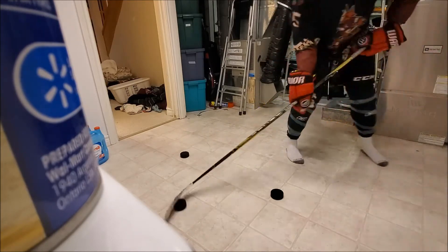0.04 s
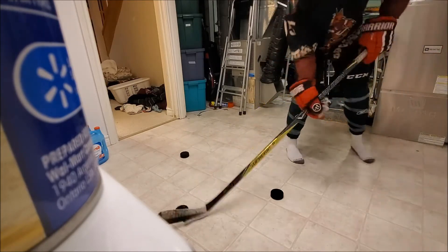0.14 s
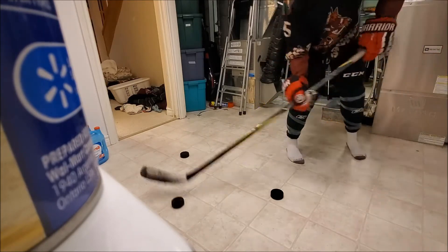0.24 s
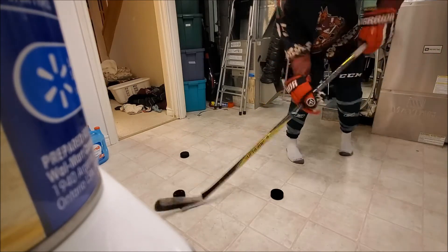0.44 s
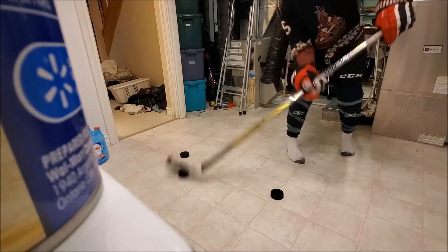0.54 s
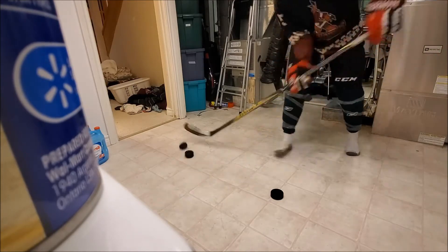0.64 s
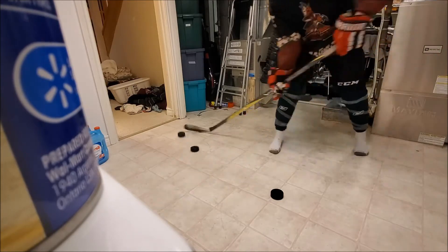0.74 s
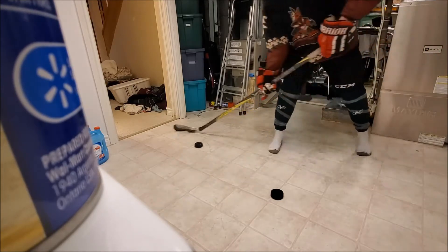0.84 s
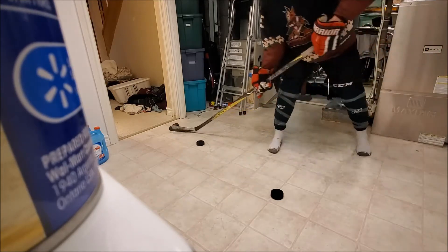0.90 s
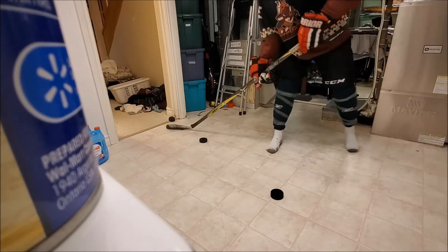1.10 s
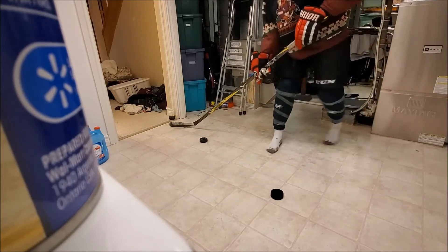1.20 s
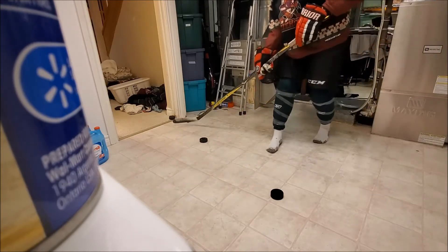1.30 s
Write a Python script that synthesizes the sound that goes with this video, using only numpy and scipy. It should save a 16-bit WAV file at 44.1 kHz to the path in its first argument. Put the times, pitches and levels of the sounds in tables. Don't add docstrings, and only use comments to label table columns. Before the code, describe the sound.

Hockey stick blade clacks sharply on a rubber puck and tiled floor, then the puck slides off

```python
import sys
import numpy as np
from scipy import signal
from scipy.fft import rfft, irfft
from scipy.io import wavfile
from scipy.ndimage import uniform_filter1d

SR = 44100
rng = np.random.default_rng(int(sys.argv[2]) if len(sys.argv) > 2 else 0)


def volts(x):
    e = np.asarray(x, float) / 20
    return 10 ** e


def log_audio(samples):
    frames = np.atleast_2d(samples).T
    limited = np.clip(frames, -1, 1)
    pcm = np.round(limited * 32767).astype(np.int16)
    wavfile.write(sys.argv[1], SR, pcm)


N = 59535

# (frequency [Hz], level [dB], time to fall 60 dB [s])
BODY_MODES = [(480.3, -9, 0.09), (570, -1, 0.01), (705, 3.5, 0.021), (806.6, 10.5, 0.017), (899, 1, 0.034),
              (1027.4, 11.5, 0.018), (690, -6, 0.0029)]
# (frequency [Hz], level [dB], time to fall 60 dB [s])
MIDDLE_MODES = [(1165, 2, 0.028), (1462, -5, 0.024), (1600, -7, 0.017), (2042, -6, 0.045),
                (2146.6, 2.5, 0.036), (1644, 13, 0.009)]
SOFT_DIRECT_DB = -7.5


def unit_rms(x):
    return x / np.sqrt(np.mean(x ** 2) + 1e-20)


def unit_energy(x):
    return x / np.linalg.norm(x, axis=-1, keepdims=True)


def read(points, hz):
    f, value = np.transpose(points)
    return np.interp(np.log(hz + 1), np.log(f + 1), value)


def colour(x, points):
    hz = np.fft.rfftfreq(x.shape[-1], 1 / SR)
    low_fade = np.clip(hz / points[0][0], 0, 1) ** 4
    return irfft(rfft(x) * volts(read(points, hz)) * low_fade, x.shape[-1])


def resonate(x, hz, width):
    r = np.exp(-np.pi * width / SR)
    return signal.lfilter([1, 0, -1], [1, -2 * r * np.cos(2 * np.pi * hz / SR), r * r], x)


def stick():
    # (time [s], blow [dB], low body [dB], upper blade [dB], tick [dB])
    taps = [
        (0.2119, -17.5, -0.5, -3, -13.5),
        (0.3573, -13.5, -9.5, -3, -17.5),
        (0.5117, -13.5, -5, -4, -15.5),
        (0.7427, -11, -7, 0, -18.5),
    ]
    # (left [dB], right [dB])
    tap_direct_db = [(-14.5, -5), (-39, -1), (-10.5, -4.5), (-22, -12)]
    # (time [s], blow [dB], low body [dB], upper blade [dB], tick [dB])
    bumps = [
        (-.05, -22, 4, -3.5, -11.5),
        (0.167, -60.5, -6, 5, 1),
        (0.41, -26.5, 3.5, -1.5, -10.5),
        (.5432, -26.5, 6, 3.5, -5.5),
        (.836, -41, 3, -11, -3),
        (1.151, -47, 3, 4.5, -2),
        (1.291, -71, 16.5, 11.5, 2),
        (.2295, -32.5, 5.5, -7, -14),
        (0.2447, -33.5, 6, -10, -20),
    ]
    # (time [s], level [dB])
    thuds = [
        (-.03, -34.5),
        (0.219, -28.5),
        (0.247, -57),
        (.362, -35),
        (.415, -35),
        (.518, -25),
        (.545, -26),
        (0.749, -37),
        (.84, -31.5),
    ]
    # (time [s], blow [dB], middle modes [dB], tick [dB], straight left [dB], straight right [dB])
    edge_blow = (.6612, -19.5, -13.5, -19.5, -8.5, -1.5)

    t = np.arange(4096) / SR
    paths = tap_direct_db + [SOFT_DIRECT_DB] * len(bumps)
    blows = [(s, tap(t, *levels, direct_db)) for (s, *levels), direct_db in zip(taps + bumps, paths)]
    blows += [(s, thud(t, db)) for s, db in thuds]
    blows.append((edge_blow[0], edge_tap(t, *edge_blow[1:])))

    lead = SR // 4
    out = np.zeros((2, N + lead + SR))
    for s, sound in blows:
        at = lead + round(s * SR)
        out[:, at:at + sound.shape[1]] += sound
    return out[:, lead:lead + N]


def tap(t, blow_db, body_db, blade_db, tick_db, direct_db):
    # (frequency [Hz], level [dB], time to fall 60 dB [s])
    blade_modes = [(2442, 0.5, 0.016), (2625, 5.5, 0.022), (2780, -0.5, 0.01), (3096, -7.5, 0.023),
                   (2790, 25.5, 0.0023)]
    blow = ring(MIDDLE_MODES, t)
    blow = blow + volts(body_db) * ring(BODY_MODES, t)
    blow = blow + volts(blade_db) * ring(blade_modes, t)
    band = signal.butter(4, [290, 2760], "band", fs=SR, output="sos")
    blow = -signal.sosfilt(band, blow)
    return heard(blow_db, blow, volts(tick_db + 1) * tick(t), direct_db)


def edge_tap(t, db, middle_db, tick_db, *direct_db):
    # (frequency [Hz], level [dB], time to fall 60 dB [s])
    edge_modes = [(1990, -10, 0.037), (2216, -5, 0.021), (2357, -11, 0.017), (2724, 0.5, 0.023),
                  (2914, -2.5, 0.025), (2970, 1, 0.012), (3220, -10, 0.015), (4440, -13, 0.014),
                  (4950, -14.5, 0.012)]
    blow = ring(edge_modes, t) * np.minimum(t / 0.0016, 1)
    blow = blow + volts(middle_db) * (ring(MIDDLE_MODES, t) + ring(BODY_MODES, t))
    return heard(db, blow, volts(tick_db) * tick(t), direct_db)


def thud(t, db):
    # (frequency [Hz], level [dB], time to fall 60 dB [s])
    floor_modes = [(281.2, 0, 0.1), (334.2, 4.5, 0.086), (406.7, 0, 0.095), (442, 0.5, 0.1)]
    blow = ring(floor_modes, t) * np.minimum(t / 0.0036, 1)
    return heard(db, blow, 0 * blow, SOFT_DIRECT_DB)


def ring(modes, t):
    contact_s, detune, uneven_db = 0.00056, 0.006, 1.2
    total = 0
    for hz, db, t60 in modes:
        level_luck, pitch_luck = rng.standard_normal(2)
        fading = volts(db + uneven_db * level_luck - 60 * t / t60)
        total = total + fading * np.sin(2 * np.pi * hz * (1 + detune * pitch_luck) * t)
    swell = 1 - np.exp(-t / contact_s)
    return unit_energy(swell * total)


def tick(t):
    # (frequency [Hz], level [dB per Hz])
    crack_spectrum = [(3300, 0), (4000, -1), (4500, -2.5), (5300, -10.5), (6300, -4), (8000, -17),
                      (15000, -9), (16500, -29)]
    click = np.zeros(len(t))
    click[20] = 1
    return unit_energy(colour(click, crack_spectrum))


def heard(db, blow, crack, direct_db):
    # (delay [s], left [dB], right [dB])
    walls = [(.0025, -12.5, -6.5), (.0055, -7, -6.5), (.0085, -20, -13.5), (.0135, -14.5, -17),
             (.0175, -11, -27), (.0235, -17, -20)]
    path = room()
    sound = signal.fftconvolve(crack[None], path, axes=1)
    for delay_s, *wall_db in walls:
        for side, (shift, sign) in enumerate(rng.uniform(-1, 1, (2, 2))):
            at = round((delay_s + 0.0008 * shift) * SR)
            path[side, at] += np.sign(sign) * volts(wall_db[side])
    sound += signal.fftconvolve(blow[None], path, axes=1)
    direct = volts(np.array(direct_db) * np.ones(2))[:, None]
    sound[:, :len(blow)] += direct * (blow + volts(-7) * crack)
    return volts(db + 7) * np.sqrt(SR / 100) * sound


def room():
    # (frequency [Hz], time to fall 60 dB [s])
    echo_t60 = [(250, 0.23), (660, 0.2), (1740, 0.18), (4590, 0.19), (12100, 0.25)]
    # (frequency [Hz], share against separate echoes [ratio])
    shared_echoes = [(200, 0.39), (400, 1.4), (700, 0.096), (4000, 0.1)]
    late_db, late_t60 = -27.5, 0.94
    first_wall_s, fill_s, early_share, lumps_db = 0.0015, 0.0032, 0.35, 3
    size = SR // 2

    at = np.arange(0, size - 16, 16) + rng.integers(0, 16, (3, (size - 1) // 16))
    strength = volts(lumps_db * rng.standard_normal(at.shape))
    echoes = np.zeros((3, size))
    np.put_along_axis(echoes, at, rng.choice([-1., 1.], at.shape) * strength, 1)

    hz, t, z = signal.stft(echoes, SR, nperseg=256)
    common = abs(read(shared_echoes, hz))[:, None]
    z = (z[:2] + common * z[2]) / np.sqrt(1 + common ** 2)
    fall = volts(-60 * t / read(echo_t60, hz)[:, None]) + volts(late_db - 60 * t / late_t60)
    tail = signal.istft(z * fall, SR, nperseg=256)[1][:, :size]

    t = np.arange(size) / SR
    fill = 1 - np.exp(-np.maximum(t - first_wall_s, 0) / fill_s)
    return unit_energy(tail * (early_share + fill))


def slide():
    # (time [s], level [dB])
    slide_level = [
        (0, -71),
        (.2, -92),
        (.8, -68),
        (.9, -49.5),
        (0.999, -42.5),
        (1.152, -45),
        (1.251, -49.5),
        (1.35, -53),
    ]
    # (frequency [Hz], width [Hz], level [dB])
    scrapes = [(1084, 61, -22), (3700, 750, -22.5), (4140, 650, -14.5), (6600, 1300, -20),
               (11600, 5000, -17.5)]
    grit = rng.standard_normal((2, N)) * volts(1.9 * rng.exponential(1, (2, N)))
    hiss = sum(volts(db) * unit_rms(resonate(grit, hz, width)) for hz, width, db in scrapes)
    return unit_rms(hiss) * volts(np.interp(np.arange(N) / SR, *np.transpose(slide_level)))


def hum():
    # (frequency [Hz], width [Hz], level [dB])
    hum_tones = [(58, 4.9, -45.5), (121.4, 11.4, -46), (175, 9.3, -47)]
    tone = np.zeros(N)
    for hz, width, db in hum_tones:
        noise = rng.standard_normal(N + SR)
        tone += volts(db) * unit_rms(resonate(noise, hz, width)[SR:])
    return tone * volts(np.array([[0.7], [-0.7]]))


def air():
    # (frequency [Hz], level [dB per Hz])
    air_spectrum = [(15, -30.5), (25, -1), (114, -1.5), (524, -12.5), (746, -13), (1470, -21), (11300, -44),
                    (15200, -31), (16500, -57)]
    # (frequency [Hz], left-right likeness [0 to 1])
    likeness = [(30, .97), (60, .88), (125, 0.22), (250, 0.29), (600, 0.37), (2000, 0.033), (15000, 0.045)]
    # (frequency [Hz], left minus right [dB])
    balance = [(40, -1), (80, 1.5), (160, 3), (500, 2), (4000, 2), (15000, 1)]
    frames, hz = N // 256 + 5, np.fft.rfftfreq(1024, 1 / SR)
    a, b, c, d, patches = rng.standard_normal((frames, 513, 5)).T
    patches = uniform_filter1d(patches, size=10, axis=0)
    patches = unit_rms(uniform_filter1d(patches, size=10, axis=1))

    same = np.clip(read(likeness, hz), -1, 1)[:, None]
    left = a + 1j * b
    right = same * left + np.sqrt(1 - same ** 2) * (c + 1j * d)
    pan_db = read(balance, hz)[:, None] / 2
    level_db = read(air_spectrum, hz)[:, None] + 1.4 * patches
    z = np.array([left, right]) * volts(level_db + np.array([pan_db, -pan_db]))
    noise = signal.istft(z, nperseg=1024, noverlap=768)[1][:, :N]
    return volts(-40.5) * unit_rms(noise)


def scene():
    return stick() + slide() + hum() + air()


def held(x, size, db_per_s):
    power = abs(uniform_filter1d((x ** 2).mean(0), size=size))
    fall = np.arange(N) * db_per_s / SR
    return np.maximum.accumulate(10 * np.log10(power + 1e-12) + fall) - fall


def turn_down(x):
    knee_db, duck = -27, 0.11
    over_db = np.maximum(held(x, size=200, db_per_s=15.5) - knee_db, 0)
    return x / volts(duck * uniform_filter1d(over_db, size=60))


def gate_hiss(x):
    # (frequency [Hz], level [dB per Hz])
    hiss_spectrum = [(3000, 2), (5000, 9.5), (8000, 2.5), (12000, 3), (15500, -8)]
    open_db = np.minimum(held(x, size=50, db_per_s=302), -12.5)
    hiss = unit_rms(colour(rng.standard_normal((2, N)), hiss_spectrum))
    hiss = hiss * volts(np.array([[-1.2], [1.2]]))
    return hiss * volts(-22.5 + 0.97 * open_db)


def low_pass(x):
    return signal.sosfilt(signal.butter(12, 16830, fs=SR, output="sos"), x)


def record(dry):
    ducked = turn_down(dry)
    heard_in = ducked + gate_hiss(ducked)
    rumble_cut = signal.butter(2, 24.5, "high", fs=SR, output="sos")
    heard_in = signal.sosfilt(rumble_cut, heard_in)
    limited = 1.217 * np.tanh(heard_in / 1.294)
    treble_cut = signal.firwin(255, 16400, window=("kaiser", 8), fs=SR)[None]
    mix = signal.oaconvolve(limited, treble_cut, "same")
    return low_pass(mix)


dry = scene()
out = record(dry)
log_audio(out)
```